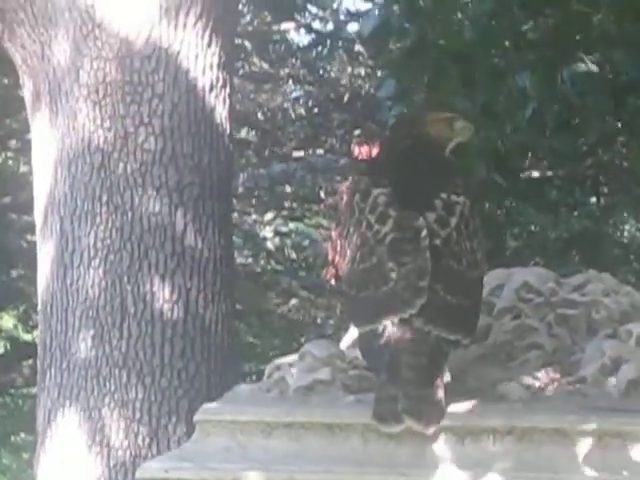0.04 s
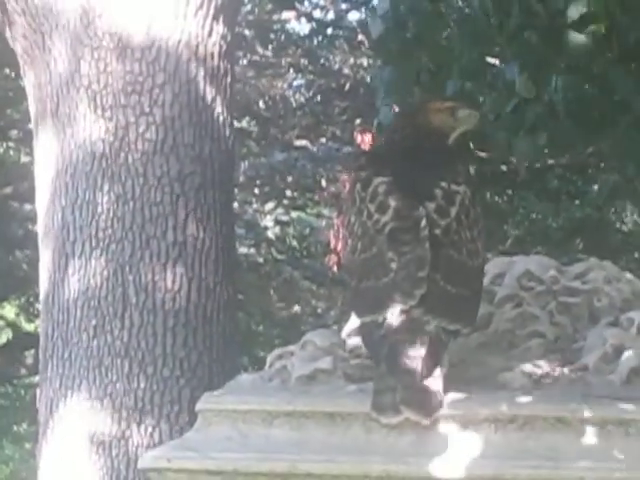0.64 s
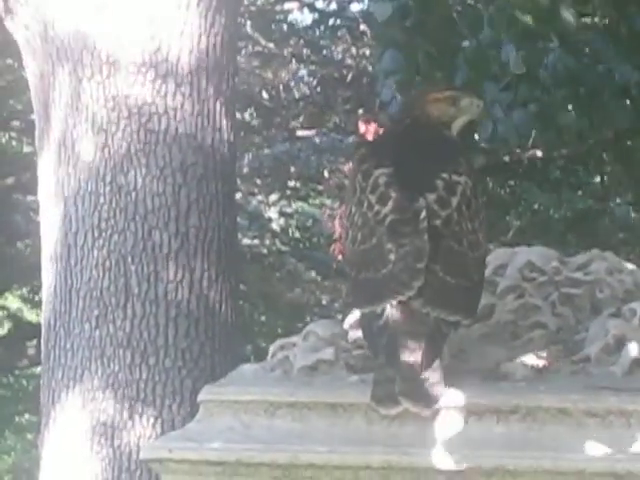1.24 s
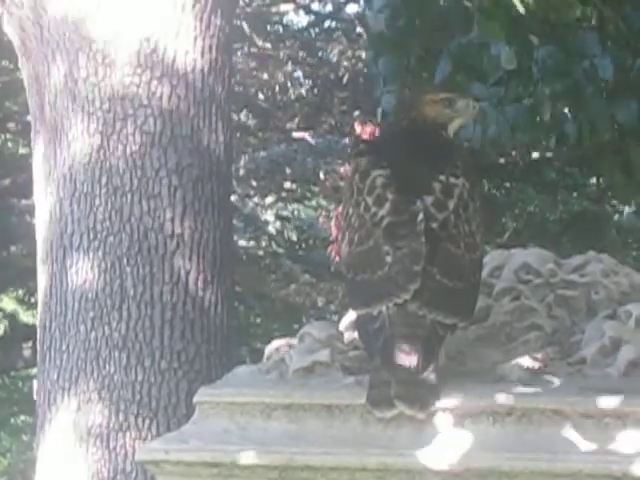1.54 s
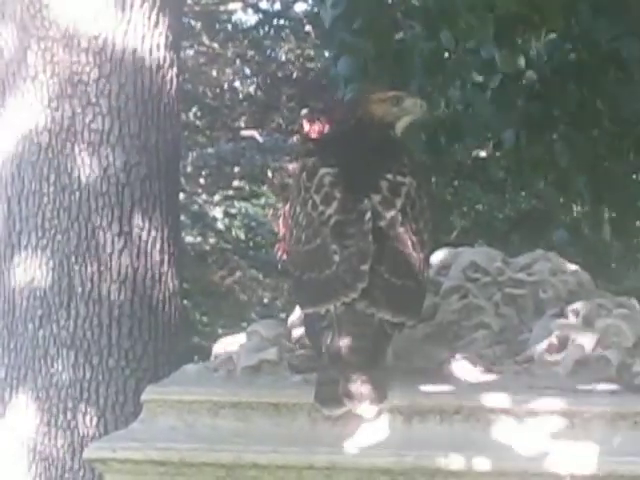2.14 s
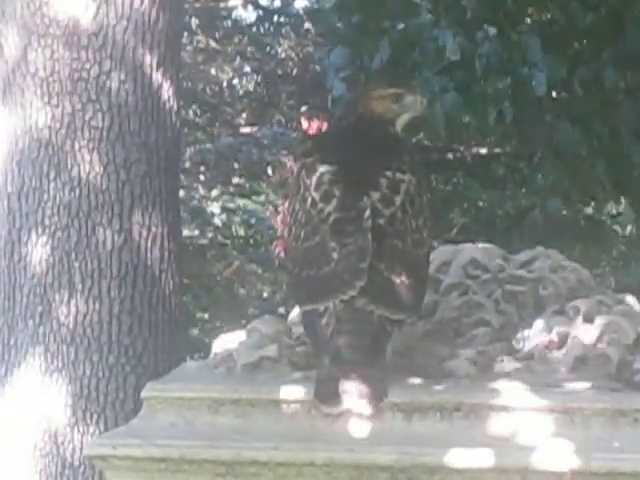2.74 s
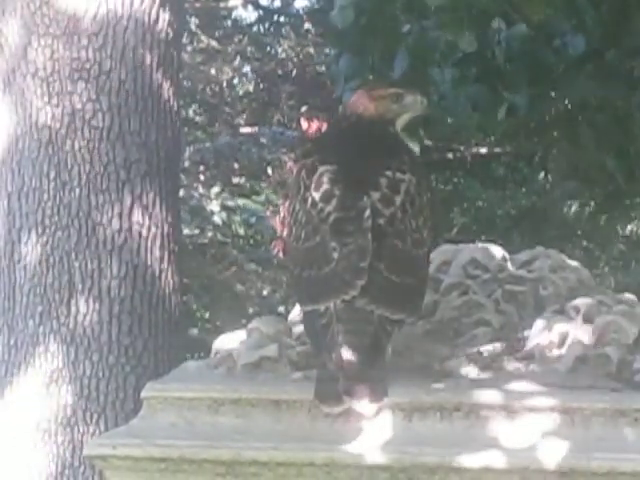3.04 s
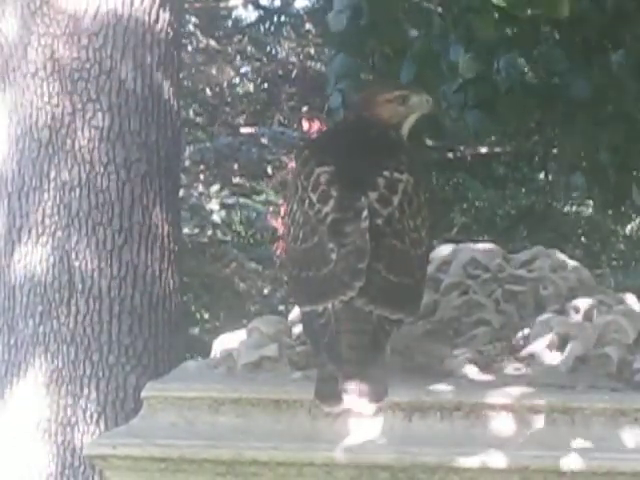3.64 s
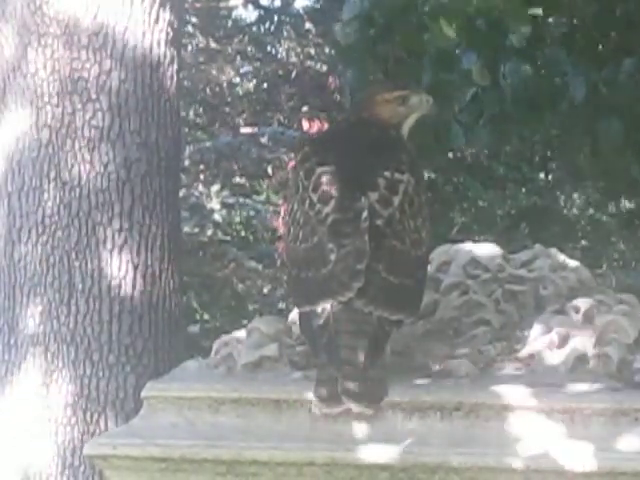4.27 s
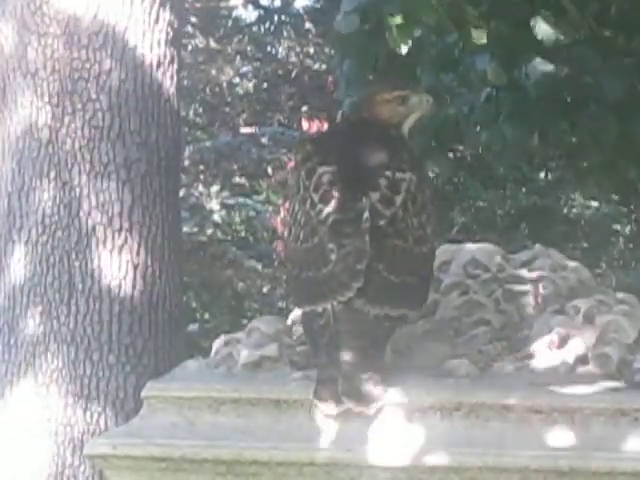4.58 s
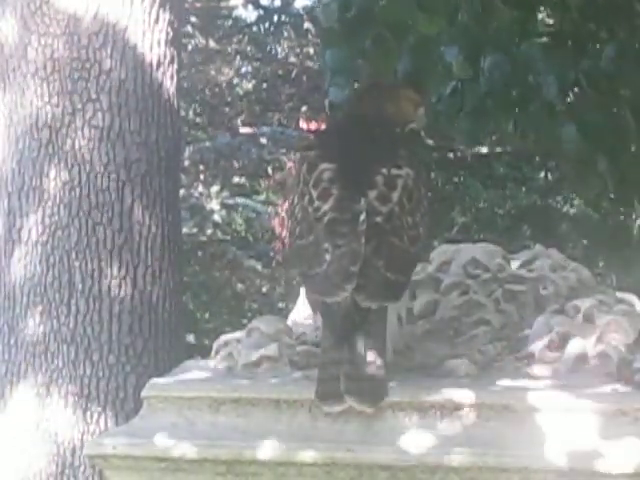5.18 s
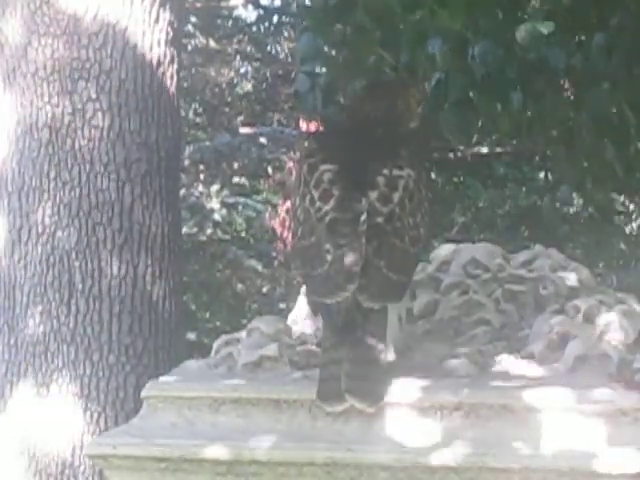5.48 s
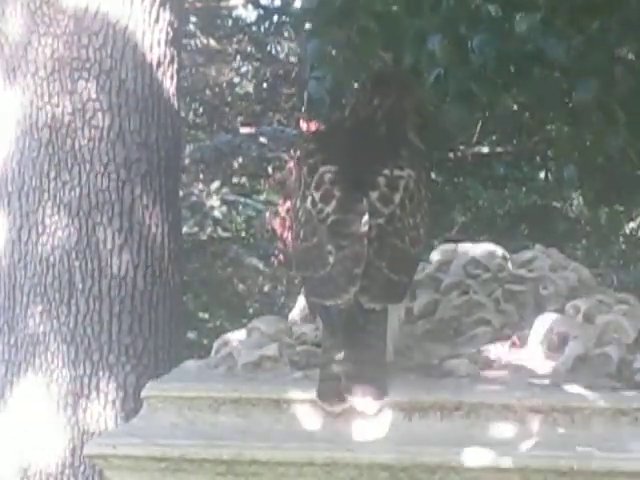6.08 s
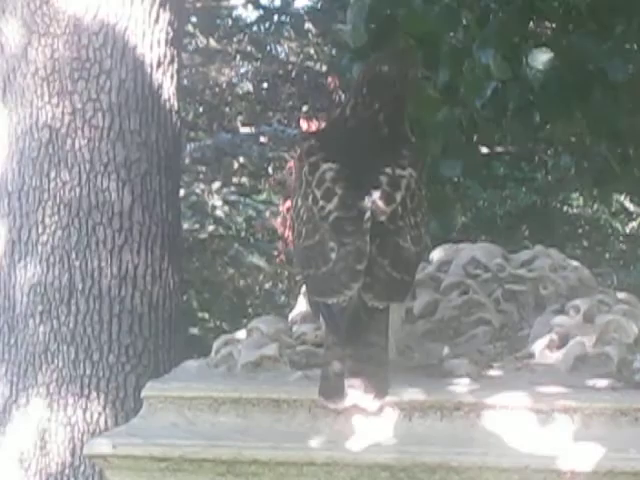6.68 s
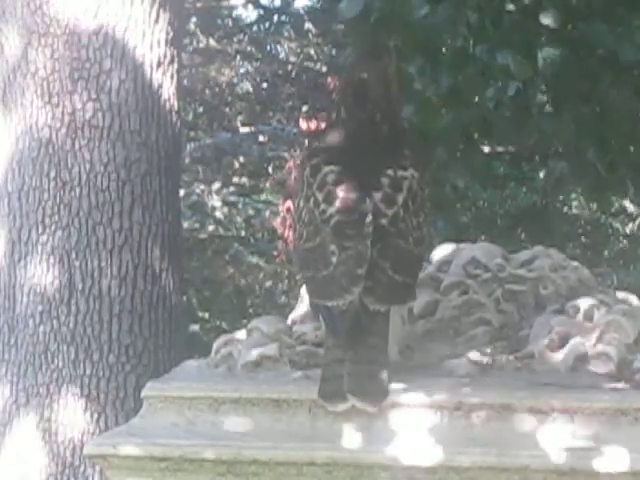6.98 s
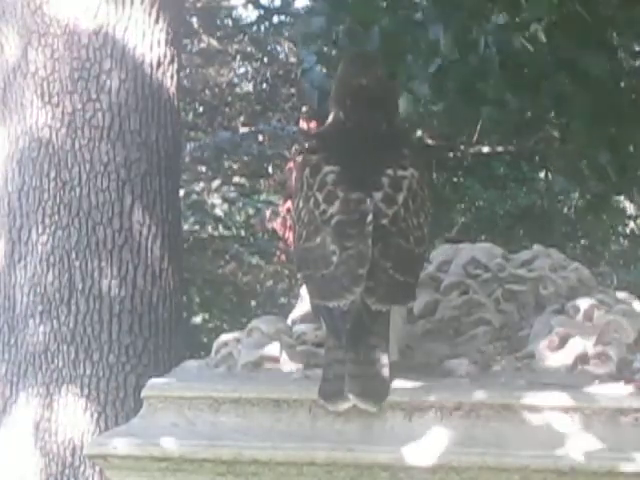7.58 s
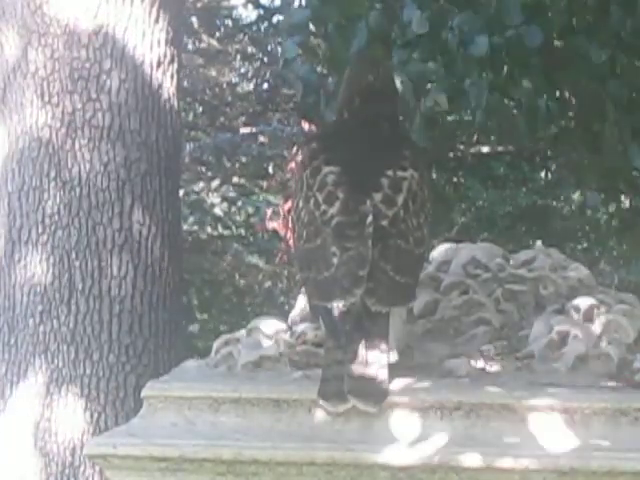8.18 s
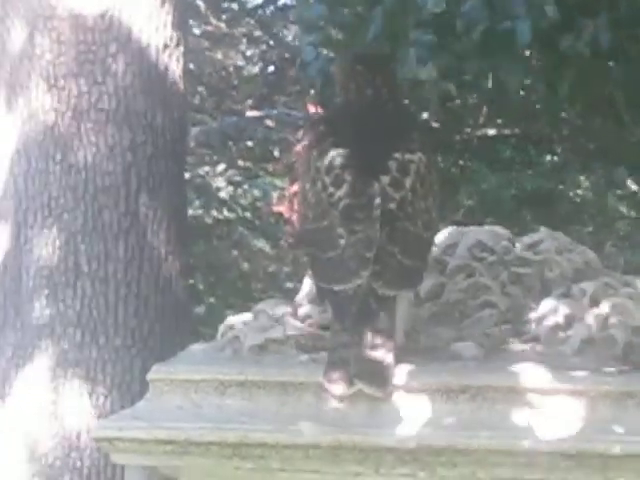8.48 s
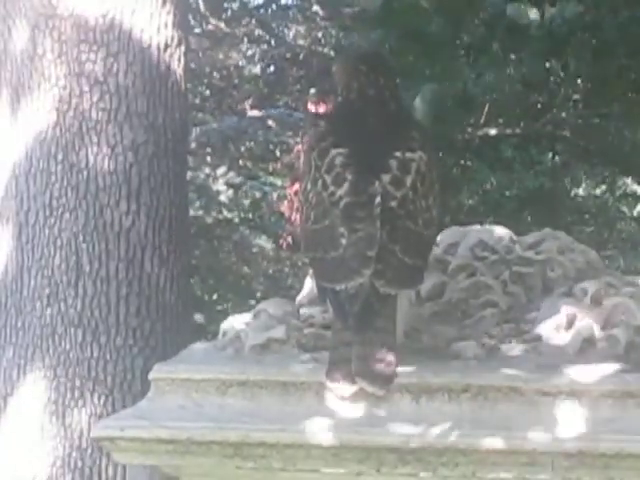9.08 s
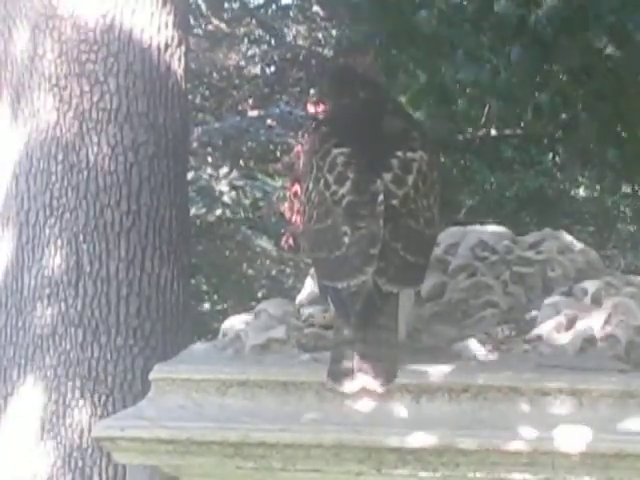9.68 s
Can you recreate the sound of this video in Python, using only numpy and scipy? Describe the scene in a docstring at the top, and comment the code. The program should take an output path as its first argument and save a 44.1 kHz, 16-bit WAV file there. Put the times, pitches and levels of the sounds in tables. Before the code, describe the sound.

Wind buffets the microphone in a garden, with low rumbling and sharp thumps, hardest in the first half second. A soft, steady hiss of leaves and a distant rumble lie underneath throughout. At 0.3 seconds a young hawk gives a shrill cry about a third of a second long, a slightly falling whistle that breaks into a rasp, with a brief echo. The wind eases into irregular puffs, with stronger bumps around 2.2, 3.6 and 4.2 seconds. The hawk cries again at 4.6 and 5.6 seconds. From about 6.2 to 8 seconds the gusts hit harder, then thin out. Small birds whistle faintly far off from 6.4 seconds onward. After 9 seconds the wind drops briefly and a few dry leaves flick quietly, before a last gust near 9.7 seconds. Each hard blow makes the whole background dip and swell back.

```python
"""Gusts buffet a microphone in a garden, over a steady hiss of leaves. At 0.3 s a young hawk begs from
a stone plinth: its syrinx gives a falling whistle that breaks, by period doubling, into a rasp.
The wind eases, and the hawk cries again at 4.6 s and 5.6 s. From 6.4 s small birds call far off as
the gusts return; after 9 s a few dry leaves flick. Throughout, a limiter ducks the whole garden
at each hard blow, then lets it swell back."""
import sys
import numpy as np
from scipy import signal
from scipy.fft import rfft, irfft, next_fast_len
from scipy.io import wavfile
from scipy.ndimage import uniform_filter1d

SR = 44100
rng = np.random.default_rng(int(sys.argv[2]) if len(sys.argv) > 2 else 0)


def master_out(mix):
    """Clip the mix to full scale and print it as 16-bit PCM to the path in sys.argv[1]."""
    frames = np.transpose(np.atleast_2d(mix))
    ceiling = np.clip(frames, -1, 1)
    pcm = np.round(ceiling * 32767).astype(np.int16)
    wavfile.write(sys.argv[1], SR, pcm)


N = 433062
TIME = np.arange(N) / SR

# Levels are relative within each table.
# Hawk cries: t/s, length/s, top pitch/Hz, level/dB, dip after/s, dip depth/dB, break after/s,
# roughness before the break (0-1), spectral tilt/(dB per octave)
HAWK_CRIES = [(.298, .31, 1783, -13, 0.12, 8, .22, .06, -0.5),
              (4.6, .335, 1779, -12.5, 0.11, 1.5, 0.27, 0.4, 0),
              (5.564, .315, 1788, -14.5, 0.144, 11, 0.213, .05, -0.5)]
# Resonances of the hawk's throat: f/Hz, level/dB
THROAT_RESPONSE = [(900, -39), (1750, -21), (2600, -8), (3450, 1.5), (4300, -12.5), (5200, -6), (6100, -8),
                   (6900, -17.5), (7900, -23.5), (8800, -32.5), (10500, -52.5), (13000, -59)]
# Spectral density of the broken voice: f/Hz, level/dB
RASP_SPECTRUM = [(1600, -37), (2100, -41), (2400, -17), (2600, 3.5), (2850, -34), (3300, 3.5), (3700, 7),
                 (4200, 0.5), (4900, 8), (5500, 3.5), (6600, 2), (7300, -17), (8600, -19), (12000, -53.5)]
# The hardest single eddies: t/s, peak level/dB, eddy rate/Hz
HARD_EDDIES = [(.005, -5, 168), (0.067, 2, 147), (.145, 0.5, 530), (0.182, 2, 400), (.21, 7, 255),
               (.248, 7.5, 605), (.257, 7.5, 523), (.343, 10, 414), (.405, 7, 436), (.498, 9, 547),
               (1.26, -5, 170), (1.478, -3.5, 175), (1.526, -1, 315), (1.615, -2.5, 386), (1.967, 0, 248),
               (2.203, -2, 275), (2.232, -2.5, 355), (2.265, 1.5, 390), (2.401, -1.5, 236),
               (2.751, -8, 100), (2.804, -3.5, 290), (2.967, -4, 195), (3.074, -3.5, 240),
               (3.486, -1.5, 227), (3.636, 5, 322), (3.673, 6, 346), (3.695, -2, 374), (4.144, 2.5, 265),
               (4.207, 2, 190), (4.447, -1, 233), (4.567, 4, 232), (5.138, -10, 219), (5.553, -1.5, 149),
               (5.969, 1, 268), (6.186, 2, 467), (6.306, 0.5, 151), (6.419, -3.5, 320), (6.443, -3, 360),
               (6.538, .5, 295), (6.706, 6.5, 313), (6.766, 3, 385), (6.811, 5.5, 266), (7.357, -1, 350),
               (7.373, 3, 290), (7.413, 1.5, 437), (7.441, 6, 450), (7.495, 5, 350), (7.542, 2, 320),
               (7.588, 7.5, 260), (7.82, 0, 350), (7.851, -1.5, 325), (7.903, -2, 310), (8.296, -3.5, 287),
               (8.475, -8.5, 153), (8.746, -1, 238), (8.894, -3, 213), (9.448, -12.5, 180),
               (9.539, -3, 314), (9.648, -0.5, 153), (9.747, -1.5, 306), (9.774, 3.5, 387)]
# Gusts at the microphone: t/s, length/s, level/dB, eddy rate/Hz
WIND_GUSTS = [(0.127, 0.085, -7, 402), (.238, 0.03, -1.5, 457), (0.313, 0.12, -5, 404),
              (0.467, 0.1, -5.5, 320), (0.627, 0.074, -7.5, 159), (0.825, .25, -17.5, 170),
              (1.202, 0.35, -16, 202), (1.567, 0.078, -13, 292), (1.892, .14, -14.5, 260),
              (2.201, .15, -12, 233), (2.373, 0.11, -19, 219), (2.785, .29, -18.5, 182),
              (3.496, 0.09, -16, 222), (3.6, 0.12, -9, 243), (3.84, 0.049, -11.5, 217),
              (3.99, 0.045, -19, 170), (4.188, 0.043, -5.5, 194), (4.33, 0.13, -12.5, 185),
              (4.547, 0.13, -12.5, 211), (4.782, .018, -13.5, 279), (5.39, 0.25, -16.5, 99),
              (5.935, 0.064, -16, 230), (6.11, .1, -16.5, 140), (6.27, 0.082, -10, 187),
              (6.42, 0.026, -10, 290), (6.504, 0.24, -15.5, 240), (6.688, 0.19, -13.5, 243),
              (6.984, 0.048, -19, 194), (7.22, .04, -11.5, 255), (7.359, 0.249, -8, 294),
              (7.671, 0.077, -10.5, 175), (7.804, .24, -15.5, 225), (8.225, 0.14, -18, 164),
              (8.45, 0.17, -19, 151), (8.704, .08, -13.5, 200), (8.864, 0.064, -15.5, 203),
              (9.433, 0.27, -19.5, 170), (9.73, 0.067, -19, 308)]
# Light air between the gusts: t/s, level/dB
BREEZE_LEVEL = [(0, -16.5), (.75, -15.5), (1.11, -26), (2.6, -22.5), (3.2, -25), (4.0, -19.5), (4.85, -22),
                (5.05, -23), (5.72, -16), (5.86, -25), (6.05, -18.5), (7.15, -23.5), (7.9, -16),
                (8.12, -26.5), (8.97, -26), (9.1, -41.5), (9.25, -46), (9.285, -27.5)]
# Whistles of far birds: t/s, length/s, first pitch/Hz, last pitch/Hz, level/dB
BIRD_NOTES = [(6.44, .06, 3140, 3150, -41), (6.5, 0.059, 2900, 2730, -50), (6.935, 0.16, 2870, 2510, -39),
              (7.46, 0.08, 2760, 2870, -40), (8.348, .016, 1700, 2050, -30.5),
              (8.475, 0.014, 2600, 1970, -37.5), (9.223, 0.039, 2720, 2750, -36),
              (9.27, 0.099, 2060, 2150, -46), (9.702, .06, 3400, 2870, -38),
              (9.775, 0.075, 2600, 2530, -46)]
# Spectral density of leaf hiss over a distant rumble: f/Hz, level/dB
LEAF_SPECTRUM = [(25, 13.5), (70, 16.5), (250, 4.5), (450, 4.5), (900, 4), (1300, -0.5), (2000, -3.5),
                 (3200, -2), (4200, -0.5), (5000, 2), (6200, -5), (8000, -16.5), (10000, -28.5),
                 (12500, -41.5)]
# Dry leaves flicking: t/s, level/dB
LEAF_FLICKS = [(3.575, -42), (9.075, -41), (9.23, -40), (9.462, -43), (9.615, -42)]
# Reverberation time among trees and walls: f/Hz, T60/s
GARDEN_T60 = [(1500, 0.22), (3300, 0.73), (5000, 0.58), (7000, 0.55), (10000, 0.22)]
# Faint stereo width in the garden's treble, side relative to mid: f/Hz, level/dB
STEREO_WIDTH = [(250, -88), (700, -58), (1400, -53), (2200, -64), (3300, -35.5), (5000, -20), (9000, -18.5)]


def hawk(voice_db=2.0, echo_db=-9.0, earlier_s=0.37, earlier_db=-2):
    """Direct and reverberant sound add: three cries, and the dying echo of an earlier one."""
    voice = np.zeros(N + SR)  # begins one second early
    add(voice, 1 - earlier_s, gain_of(earlier_db) * syrinx(*HAWK_CRIES[2][1:]))
    for s, *shape in HAWK_CRIES:
        add(voice, 1 + s, syrinx(*shape))
    return (gain_of(voice_db) * voice + gain_of(echo_db) * garden_echo(voice))[SR:]


def syrinx(*shape, half_partial_db=-7, hoarse_hz=130, breath=0.039, lock_hz=2580, lock_db=3):
    """Period doubling: alternate cycles are unequal, the period doubles again, then chaos sets in."""
    *course, tilt_db = shape
    hz, level_db, rough, dip_db = cry_contour(*course)
    rough, size = np.clip(rough, 0, .95), len(hz)
    jitter = 1 + 0.00307 * wander(size, 60) + 0.00202 * wander(size, 17.4)
    phase = 2 * np.pi * np.cumsum(hz * jitter) / SR
    phase += 0.065 * rough * wander(size, 400)  # uneven cycles smear the high partials most
    voice = np.zeros(size)
    for k in np.arange(2, 16) / 2:
        # as the voice breaks, its lowest half partial locks on to a throat resonance
        lock = np.minimum(2 * rough, 1) * (k == 1.5)
        pull_hz = lock * (lock_hz - k * hz)
        partial_db = read(THROAT_RESPONSE, k * hz + pull_hz) + half_partial_db * (k % 1 > 0)
        clear = gain_of(partial_db + lock_db * lock + 3.2 * wander(size, 27))
        # in chaos every partial frays into a narrow band; the lowest keep their pitch longest
        chaos = wander(size, hoarse_hz) + 1j * wander(size, hoarse_hz)
        frayed = gain_of(read(RASP_SPECTRUM, k * hz)) * chaos / 3
        fray = rough if k >= 2 else 0.13 * rough
        strength = gain_of(tilt_db * np.log2(k / 2) - dip_db * (k <= 2))  # low partials dip briefly
        angle = k * phase + 2 * np.pi * (np.cumsum(pull_hz) / SR + rng.random())
        voice += strength * (((1 - fray) * clear + fray * frayed) * np.exp(1j * angle)).real
    voice *= 1 + 0.69 * np.minimum(rough, .25) * np.cos(phase / 4)  # second period doubling
    rasp = noise(size, lambda f: gain_of(read(RASP_SPECTRUM, f))) * (1 + 0.92 * np.cos(phase / 2))
    rasp_share = np.clip(breath + 0.59 * rough, 0, .9)
    sound = np.sqrt(1 - rasp_share ** 2) * unit_rms(voice) + rasp_share * unit_rms(rasp)
    flutter_db = 1.27 * wander(size, 68)
    return sound * gain_of(level_db + flutter_db) * signal.windows.tukey(size, .02)


def cry_contour(length, top_hz, db, dip_s, dip_db, break_s, rough_held,
                scoop=.19, sag=.135, swell_s=0.049, release_s=0.039, rough_broken=0.68):
    """Modulation: a scratchy scoop, a brief mid-cry dip in the low partials, a hoarse falling end."""
    t = np.arange(0, length, 1 / SR)
    hz = top_hz * (1 - scoop * np.exp(-t / .012) - sag * (t / length) ** 2)
    scratch = np.exp(-(t / .017) ** 2)
    dip = np.exp(-((t - dip_s) / 0.025) ** 2)
    broken = .5 + .5 * np.tanh((t - break_s) / 0.022)
    release = np.maximum(1 - (length - t) / release_s, 0)
    level_db = db - 11 * np.exp(-t / swell_s) - 2 * broken - 15.5 * release  # swells, tires, stops
    rough = rough_held + .8 * scratch + 0.12 * dip + (rough_broken - rough_held) * broken
    return hz, level_db, rough, dip_db * dip


def wind(rebound_rad=1.0, spread=1.136, wake=0.31, wake_s=0.00564):
    """Pressure pulses: a hard eddy displaces the flow with a push, an uneven rebound and a wake."""
    blows, displaced = np.zeros(N), np.zeros(N)
    t = np.arange(-(SR // 50), SR // 50) / SR
    for s, db, hz in HARD_EDDIES:
        passage = 2 * np.pi * hz * t / spread
        skew = np.exp(1j * rng.uniform(-rebound_rad, rebound_rad))
        push = (skew / (1 - 1j * passage / 3) ** 4).real
        blow = rng.choice([-1, 1]) * gain_of(db) * push / abs(push).max()
        add(blows, s + t[0], blow)
        add(blows, s + t[0] + wake_s * rng.uniform(0.633, 1.474), -wake * blow)
        add(displaced, s + t[0], np.exp(-(passage / 1.56) ** 2))
    return turbulence() * (1 - np.minimum(displaced, 1)) + blows


def turbulence(level_db=-0.58, surge_db=3, port_hz=66, crest=9.6):
    """Turbulent pressure at the microphone port: faster air makes smaller eddies and a wider band."""
    db, rate_hz = airflow()
    surge = wander(N, 67.0)
    corner_hz = 1.52 * rate_hz * np.exp(0.22 * surge)
    flow, power = np.zeros(N), np.zeros(N)
    for hz in 25 * 2 ** (np.arange(10) * 2 / 3):
        band = noise(N, lambda f: np.exp(-(2 * np.log2((f + 1) / hz)) ** 2))
        port_highpass = 1 / np.hypot(1, (port_hz / hz) ** 2)
        weight = np.sqrt(hz) * port_highpass / (1 + (hz / corner_hz) ** 2) ** 2.287
        flow += weight * band
        power += weight ** 2
    flow = unit_rms(flow / np.sqrt(power) * gain_of(surge_db * surge))
    return crest * np.tanh(flow / crest) * gain_of(level_db + db)


def airflow(breeze_eddy_hz=141, rise_s=0.0065, fall_s=0.013):
    """Incoherent addition: breeze and gusts sum in power; the eddy rate is their power-weighted mean."""
    power = gain_of(np.interp(TIME, *np.transpose(BREEZE_LEVEL))) ** 2
    weighted_rate = breeze_eddy_hz * power
    for s, length, db, hz in WIND_GUSTS:
        t = np.arange(-(SR // 10), (length + .2) * SR) / SR
        envelope = np.exp(np.minimum(t, 0) / rise_s - np.maximum(t - length, 0) / fall_s)
        gust_power = (gain_of(db) * envelope) ** 2
        add(power, s + t[0], gust_power)
        add(weighted_rate, s + t[0], hz * gust_power)
    return 10 * np.log10(power), weighted_rate / power


def far_birds(direct_db=-2.0, echo_db=-15):
    """Frequency glides: short, nearly pure whistles slide and settle on a pitch."""
    calls = np.zeros(N)
    for s, length, first_hz, last_hz, db in BIRD_NOTES:
        size = int(length * SR)
        glide_hz = last_hz + (first_hz - last_hz) * np.linspace(1, 0, size) ** 3
        hz = glide_hz * (1 + .012 * wander(size, 200))
        whistle = np.sin(2 * np.pi * np.cumsum(hz) / SR) * signal.windows.tukey(size, .6)
        add(calls, s, gain_of(db) * unit_rms(whistle))
    return gain_of(direct_db) * calls + gain_of(echo_db) * garden_echo(calls)


def leaves(level_db=-32.0, grain_db=0.11, swell_db=0.65, flick_decay_s=0.028):
    """Friction noise: countless brushing leaves sum to a hiss; now and then a near one flicks."""
    hiss = noise(N, lambda f: gain_of(read(LEAF_SPECTRUM, f)))
    hiss *= gain_of(level_db + grain_db * wander(N, 170) + swell_db * wander(N, 3.1))
    t = np.arange(SR // 10) / SR
    for s, db in LEAF_FLICKS:
        crackle = noise(len(t), lambda f: np.exp(-((f - 6200) / 2300) ** 2))
        crackle *= gain_of(4.3 * wander(len(t), 400))
        add(hiss, s, gain_of(db) * crackle * np.exp(-t / flick_decay_s))
    return hiss


def garden_echo(x, echoes_per_s=2500, gap_s=.012):
    """Reverberation: sparse reflections from trunks, leaves and walls, lasting longest near 3.3 kHz."""
    taps = rng.standard_normal(SR) * (rng.random(SR) < echoes_per_s / SR) * (np.arange(SR) > gap_s * SR)
    hz, t, spectrum = signal.stft(taps, SR, nperseg=256)
    decay = gain_of(-60 * t / read(GARDEN_T60, hz)[:, None])
    tail = signal.istft(spectrum * decay, SR, nperseg=256)[1]
    return signal.fftconvolve(x, tail / np.linalg.norm(tail))[:len(x)]


def gain_of(db):
    """The decibel law: 20 dB is a tenfold amplitude."""
    return 10 ** (np.asarray(db) / 20)


def unit_rms(x):
    """Normalisation to rms 1."""
    return x / np.sqrt(np.mean(x ** 2) + 1e-20)


def read(points, hz):
    """Interpolation of a table on a log-frequency axis."""
    f, value = np.transpose(points)
    return np.interp(np.log(hz + 1), np.log(f + 1), value)


def add(mix, s, sound):
    """Superposition: a sound joins the mix at time s."""
    part = mix[max(round(s * SR), 0):][:len(sound)]
    part += sound[:len(part)]


def noise(size, shape):
    """Spectral shaping: noise of rms 1 whose amplitude spectrum follows shape(f)."""
    padded = next_fast_len(size)
    white = rfft(rng.standard_normal(padded))
    return unit_rms(irfft(white * shape(np.fft.rfftfreq(padded, 1 / SR)), padded)[:size])


def wander(size, hz):
    """Random modulation: low-pass noise of rms 1 that moves at up to about hz."""
    return noise(size, lambda f: np.exp(-(f / hz) ** 2))


def scene():
    """Mid-side stereo: faint width in the garden's treble; wind and bass stay centred."""
    mid = hawk() + far_birds() + leaves()
    padded = next_fast_len(N + SR)
    side_gain = gain_of(read(STEREO_WIDTH, np.fft.rfftfreq(padded, 1 / SR)))
    side = irfft(1j * rfft(mid, padded) * side_gain, padded)[:N]
    return np.array([mid + side, mid - side]) + wind()


def limiter(x, limit_db=-7.5, clamp_s=0.0022, recover_db_per_s=29, treble_bias=2, opening_duck_db=8):
    """Peak limiting: the gain drops at once on a peak, treble counting extra, and recovers slowly."""
    sensed = signal.lfilter([1 + treble_bias, -treble_bias], [1], x.mean(0))
    recovery_db = recover_db_per_s * TIME
    opening_db = np.maximum(opening_duck_db - recovery_db, 0)  # still recovering from an earlier gust
    over_db = np.maximum(20 * np.log10(abs(sensed) + 1e-9) - limit_db, opening_db)
    held_db = np.maximum.accumulate(over_db + recovery_db) - recovery_db
    return x * gain_of(-uniform_filter1d(held_db, round(clamp_s * SR)))


def record(dry, ceiling=.55, self_noise_db=-65, edge_hz=15800):
    """Saturation rounds off what slips through the limiter; amplifier hiss and a band limit follow."""
    out = limiter(dry)
    out = out / (1 + (out / ceiling) ** 6) ** (1 / 6)
    hiss = np.array([noise(N, lambda f: f ** 2 / (f ** 2 + 3000 ** 2)) for _ in dry])
    out = (out + gain_of(self_noise_db) * hiss) * signal.windows.tukey(N, .001)
    lowpass = signal.firwin(511, edge_hz, window=("kaiser", 9), fs=SR)
    return signal.oaconvolve(out, lowpass[None], "same")


dry = scene()
out = record(dry)
master_out(out)
```